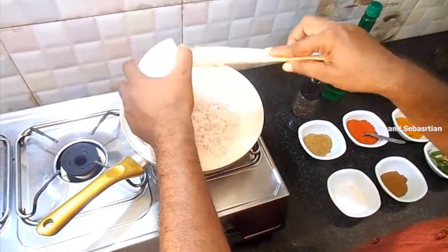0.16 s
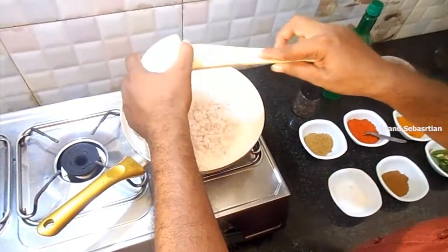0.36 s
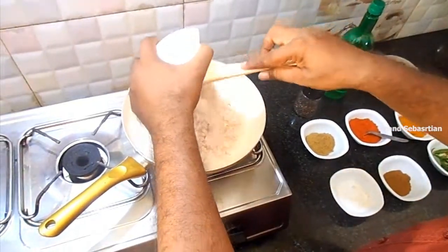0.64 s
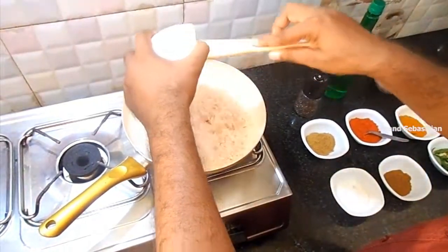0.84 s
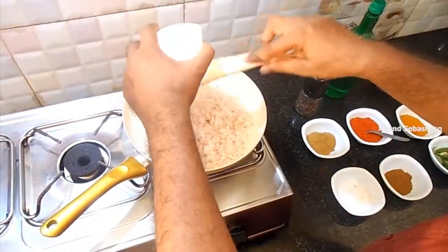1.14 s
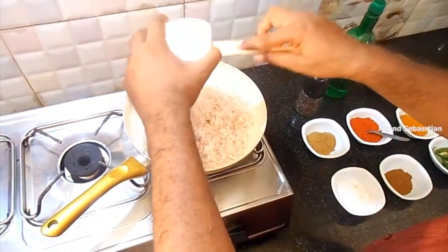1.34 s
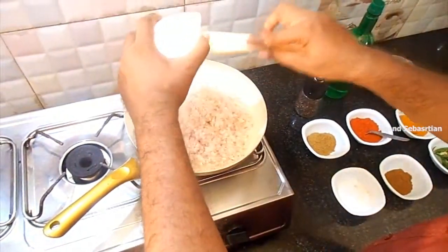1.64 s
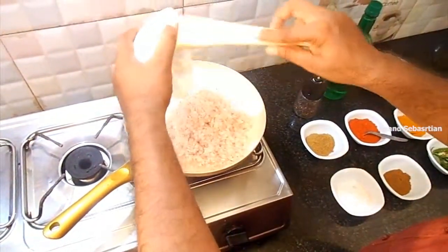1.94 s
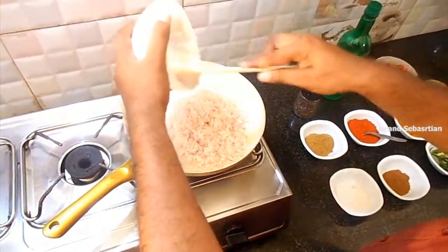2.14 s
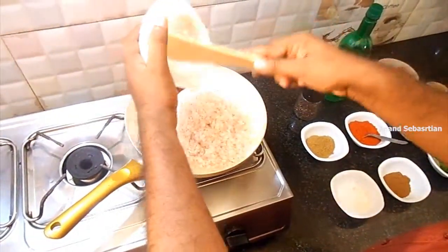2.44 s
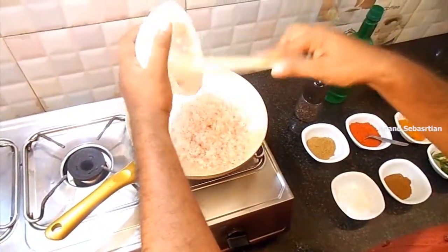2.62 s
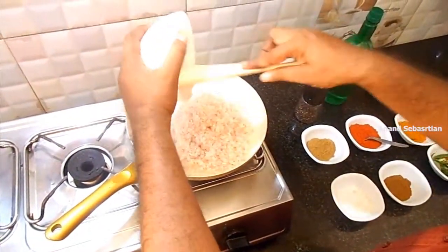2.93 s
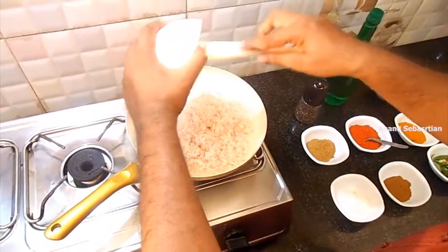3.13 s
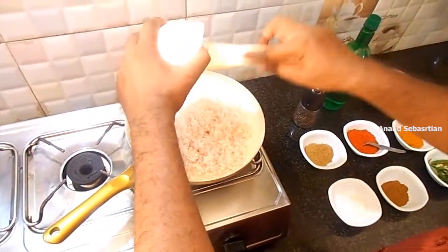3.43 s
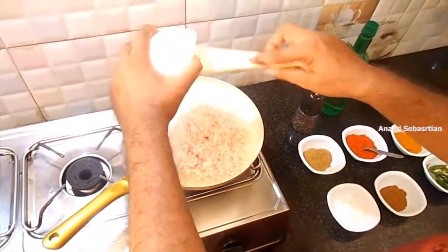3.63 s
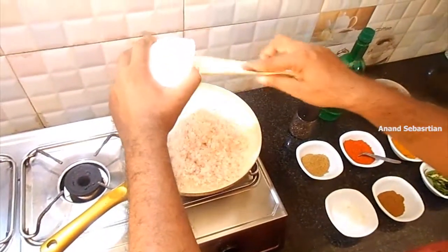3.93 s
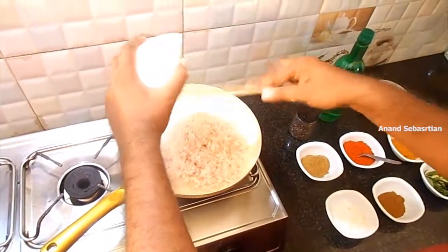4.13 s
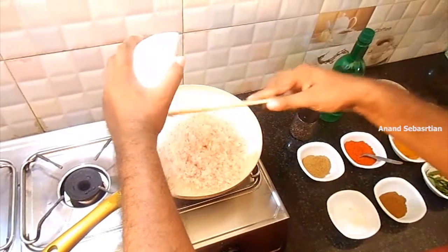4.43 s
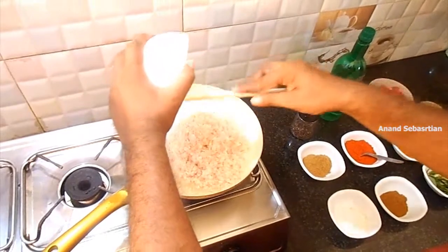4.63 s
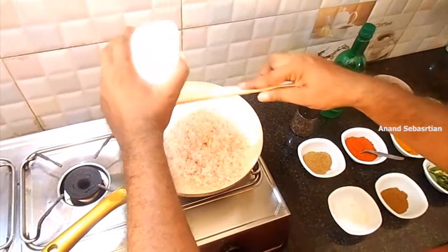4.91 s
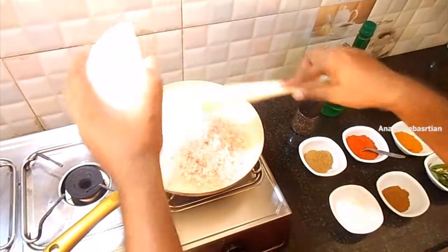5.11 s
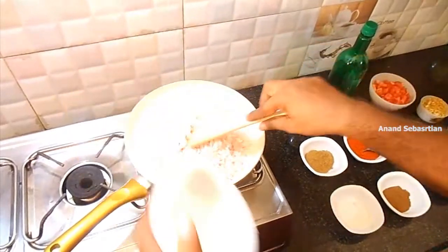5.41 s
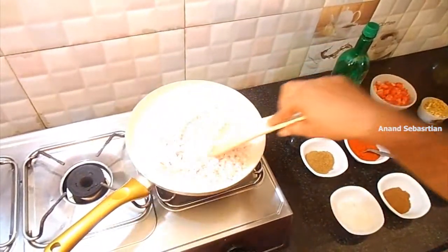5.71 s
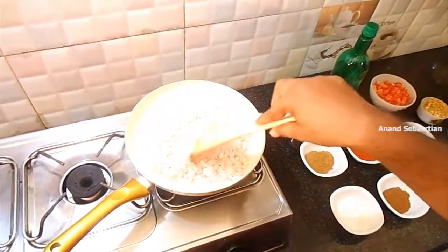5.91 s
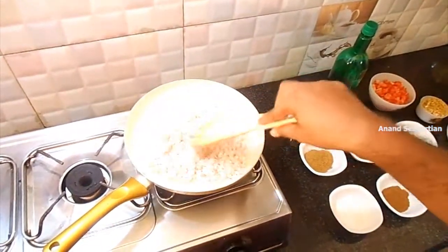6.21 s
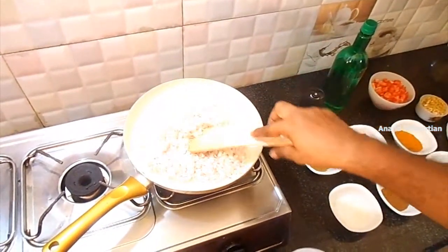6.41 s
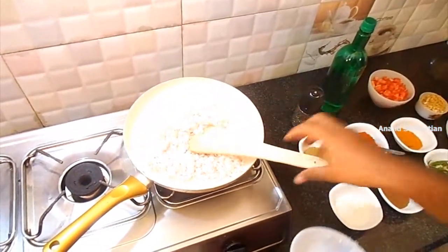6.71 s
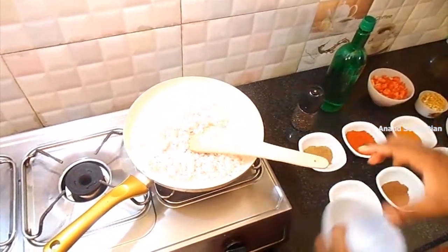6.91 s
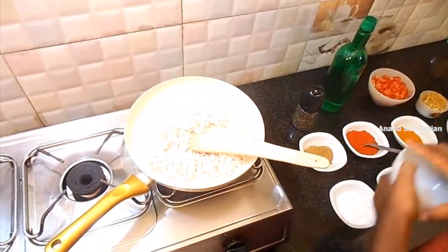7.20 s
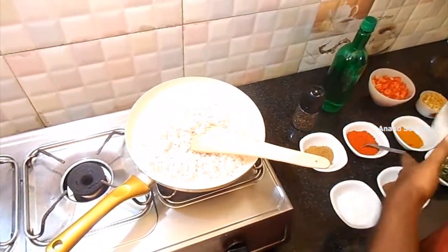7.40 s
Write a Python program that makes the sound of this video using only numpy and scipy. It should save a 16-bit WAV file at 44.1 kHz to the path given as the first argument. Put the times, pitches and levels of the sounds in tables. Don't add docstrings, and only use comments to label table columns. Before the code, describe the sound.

Chopped onion fries in hot oil very close to a stereo microphone in a kitchen. The sizzle is continuous, dense and bright, made of countless tiny bubble bursts over a hiss, with little bass and faint irregular low ticks. It dips slightly around 0.7 s, swells at 1 s and dips again near 2.5 s. Sharp oil spits snap at about 0.2, 0.9, 1.35, 1.5, 2.3, 2.5, 3.2, 4.4, 4.7 and 5.0 s, some leaning to one side. A wooden spatula taps a hollow plastic bowl: a clear knock at 1.1 s, a cluster at 2.2-2.5 s with dull rumble, more at 3.1-3.5 s, a faint one at 4.1 s, a clacking double hit with deeper rumble at 4.45 s, and another at 4.75 s. From 4.8 s the frying is somewhat softer; a tiny scrape comes at 5.2 s, a weak tap at 5.45 s and a small spit at 5.7 s. Then only slowly dulling sizzle until 7.5 s.

```python
import sys
import numpy as np
from scipy import signal
from scipy.fft import rfft, irfft, next_fast_len
from scipy.io import wavfile

SR = 44100
rng = np.random.default_rng(int(sys.argv[2]) if len(sys.argv) > 2 else 0)


def int16_out(signal):
    q = np.round(np.clip(np.atleast_2d(signal).T, -1, 1) * 32767)
    wavfile.write(sys.argv[1], SR, q.astype(np.int16))


def attenuation_scalar(level_db):
    decades = np.asarray(level_db, float) / 20
    return 10 ** decades


N = 332955

# (time [s], sizzle level [dB], tilt [dB])
VIGOUR = [(0.0, -31, .5), (.2, -30.5, 2), (.67, -30.5, 2), (.73, -33.5, 2), (.86, -32.5, 0.5),
          (.97, -28, .5), (1.58, -29.5, 1), (1.67, -31.5, 1), (1.74, -29, 1), (2.46, -29.5, 1),
          (2.53, -33, 1), (2.72, -31.5, 1), (3.2, -30, 0.5), (3.32, -30.5, .5), (4.72, -30, -.5),
          (4.83, -33.5, 0), (6.5, -32.5, -1), (7.55, -34, -1)]


def rms_one(x):
    return x / np.sqrt(np.mean(x ** 2) + 1e-20)


def in_time(rows):
    s, *columns = np.transpose(rows)
    return [np.interp(np.arange(N) / SR, s, c) for c in columns]


def at_hz(points, hz):
    table_hz, table_db = np.transpose(points)
    return np.interp(np.log(hz + 1), np.log(table_hz), table_db)


def drift(rate):
    step = 40
    pole = np.exp(-2 * np.pi * rate * step / SR)
    noise = rng.standard_normal(N // step + 2002)
    slow = signal.lfilter([1], [1, -2 * pole, pole ** 2], noise)[2000:]
    return np.interp(np.arange(N) / step, np.arange(len(slow)), rms_one(slow))


def ring(clicks, hz, t60):
    radius, angle = attenuation_scalar(-60 / (t60 * SR)), 2 * np.pi * hz / SR
    recursion = [1, -2 * radius * np.cos(angle), radius ** 2]
    return signal.lfilter([0, np.sin(angle)], recursion, clicks + 1e-18)


def click(s, size):
    out = np.zeros(N)
    out[round(s * SR)] = size
    return out


def gate_opening():
    # (time [s], opening [dB], hold [s])
    strokes = [(0.0, 11, 0.29), (0.587, 7, .12), (0.997, 9.5, .1), (1.102, 15.5, 0.14), (1.548, 6.5, .3),
               (1.88, 10.5, 0.13), (2.22, 17, 0.066), (2.45, 7.5, 0.47), (2.91, 10, .4), (3.3, 11, 0.28),
               (3.7, 8, 0.28), (4.086, 12.5, 0.19), (4.46, 13.5, 0.1), (4.75, 13.5, 0.035),
               (5.035, 10.5, 0.075), (5.335, 7, 0.18), (5.91, 5.5, 0.073), (5.6, 3, .15), (6.697, 0, 0.32),
               (7.35, 4.5, 0.061)]
    opens_db_per_s, shuts_db_per_s, shut_db = 250, 51, -2.5
    s, db, hold = np.transpose(strokes)[:, :, None]
    t = np.arange(0, N, 40) / SR
    rise = opens_db_per_s * np.maximum(s - t, 0)
    fall = shuts_db_per_s * np.maximum(t - s - hold, 0)
    widest = (db - rise - fall).max(axis=0)
    return np.interp(np.arange(N) / SR, t, np.maximum(widest, shut_db))


def bass_ticks(level_db):
    ticks_per_s, tick_db, hush_db, side_db = 103.9, -47.5, -77, -9.5
    at = (np.arange(.0064, N / SR - .01, 1 / ticks_per_s) * SR).astype(int)
    sizes = rng.normal(0, 1.6, (2, len(at)))
    heard = rng.random(len(at)) < .5
    ticks = np.zeros((2, N))
    ticks[:, at] = sizes * heard * attenuation_scalar(tick_db + 2.4 * drift(5)[at] - 1.5)
    mid, side = ticks + attenuation_scalar(hush_db) * rng.standard_normal((2, N))
    ports = mid + attenuation_scalar(side_db) * side * [[1], [-1]]
    ports = ports * attenuation_scalar(level_db - level_db.mean())
    bass = signal.butter(2, 900, fs=SR, output="sos")
    return signal.sosfilt(bass, ports) * attenuation_scalar(13.0)


def rumbles():
    # (time [s], level [dB], lowest frequency [Hz], t60 [s])
    knocks = [
        (2.21, -63, 500, 0.67),
        (2.3, -55.5, 360, 0.59),
        (2.53, -60, 400, 0.21),
        (4.445, -56, 306, 0.93),
    ]
    out, t = np.zeros((2, N)), np.arange(N) / SR
    for s, db, low_hz, t60 in knocks:
        hollow = signal.butter(3, [low_hz, 850], "band", fs=SR, output="sos")
        mid, side = signal.sosfilt(hollow, rng.standard_normal((2, N)))
        decay = (t > s) * attenuation_scalar(db - 60 * np.maximum(t - s, 0) / t60)
        out += rms_one(mid + attenuation_scalar(-12.0) * side * [[1], [-1]]) * decay
    return out


def scrape():
    start_s, end_s, mode_hz, t60_s, level_db = 5.18, 5.25, 1998, .05, -41
    t = np.arange(N) / SR
    catches = rng.standard_normal(N) * (t > start_s) * (t < end_s)
    return attenuation_scalar(level_db - 24) * ring(catches, mode_hz, t60_s)


def taps():
    # (time [s], peak level [dB], loudest mode [Hz],
    # clack relative level [dB], whole-bowl relative level [dB])
    hits = [(1.118, -39.5, 627, -24, 14), (1.119, -27, 1180, -19, -3), (2.21, -38.5, 915, -14, -4),
            (2.263, -34, 1110, -8, -4), (2.302, -33.5, 890, -14, 1), (2.536, -40, 1110, -12, 0),
            (3.115, -38, 950, -10, 0), (3.315, -27.5, 1150, -16, -8), (3.481, -30.5, 886, -21, -1),
            (4.09, -40, 1160, -16, -4), (4.441, -39, 1420, -14, 0), (4.445, -31.5, 886, -20, -7),
            (4.751, -29, 900, -14, -10), (4.885, -54, 974, -14, -7), (5.458, -39, 960, -12, -10)]
    # (frequency [Hz], level [dB], t60 [s])
    bowl = [(588, -11, 0.067), (646, -6, .03), (900, -8, 0.028), (1180, -20, 0.03)]
    # (frequency [Hz], level [dB], t60 [s])
    blade = [(1530, -13, .012), (1900, -9, .012), (2260, -2, .018), (2750, -1, .017), (3200, -6, .01),
             (3900, -3, .01)]
    contact_s, slap_s, slap_db = 0.0012, 4.4432, -24.5
    out = np.zeros(N)
    chance_db = rng.normal(0, 2.7, (len(hits), len(bowl) + len(blade)))
    for (s, peak_db, spot_hz, clack_db, whole_db), luck_db in zip(hits, chance_db):
        a, b = round(s * SR), min(N, round((s + .3) * SR))
        hit = click(0, 0.91)[:b - a]
        struck = [(spot_hz, peak_db + .5, .04)]
        struck += [(hz, peak_db + whole_db + db, t60) for hz, db, t60 in bowl]
        struck += [(hz, peak_db + clack_db + db, t60) for hz, db, t60 in blade]
        rings = np.zeros(b - a)
        for (hz, db, t60), extra_db in zip(struck, np.r_[0, luck_db]):
            rings += attenuation_scalar(db + extra_db) * ring(hit, hz, t60)
        out[a:b] += rings * (1 - np.exp(-np.arange(b - a) / SR / contact_s))
    slap = click(slap_s, attenuation_scalar(slap_db)) + click(slap_s + 0.003, attenuation_scalar(slap_db - 2))
    return out + sum(attenuation_scalar(db) * ring(slap, hz, t60) for hz, db, t60 in blade)


def spits():
    # (time [s], peak level [dB], left-right difference [dB])
    droplets = [(0.178, -11, -5), (0.4653, -31, -5), (0.5067, -16, -0.5), (0.8764, -7, -1.0),
                (0.9353, -16, 0.0), (1.3513, -8, -0.5), (1.5304, -4.5, 1), (2.2633, -9, -1.0),
                (2.464, -5, -9), (2.609, -27, -4), (2.6454, -25, 8), (3.2266, -6, -0.5), (4.4408, -9, -3),
                (4.7287, -11, 7), (5.0409, -13, -0.5), (5.7259, -19, 4)]
    pulses = np.zeros((2, N))
    for s, peak_db, pan_db in droplets:
        pulses[:, round(s * SR) + 50] = attenuation_scalar(peak_db + 3.5 + np.array([pan_db, -pan_db]) / 2)
    spray = signal.lfilter([.12], [1, -.985], pulses) * rng.standard_normal(N)
    small_source = signal.butter(2, [3500, 14000], "band", fs=SR, output="sos")
    return signal.sosfilt(small_source, spray - pulses)


def steam_bursts():
    bursts_per_s, spread_db, hiss = 12000, 2, 0.94
    sizes = attenuation_scalar(spread_db * np.minimum(rng.exponential(1, N), 5)) * rng.choice([-1, 1], N)
    born = rng.random(N) < bursts_per_s * attenuation_scalar(.8 * drift(25)) / SR
    return rms_one(sizes * born) + hiss * rng.standard_normal(N)


def pan_spectra(bursts, size, hz):
    # (frequency [Hz], level per Hz [dB])
    colour = [(330, -48), (560, -12.5), (591, -15.5), (773, -13.5), (896, -8), (1010, -8.5), (1360, -7),
              (1600, -4), (2030, -0.5), (2490, -2), (3040, 0.5), (4320, -0.5), (10900, -3.5), (13000, -4.5),
              (14200, -7)]
    # (frequency [Hz], level per Hz [dB])
    across_colour = [(330, -40), (540, -19.5), (1200, -19), (1700, -15.5), (2400, -26.5), (3200, -6),
                     (3700, -9), (4800, -4.5), (12000, 1.5), (14200, -3)]
    # (frequency [Hz], width [Hz], height [dB])
    modes = [(610, 18, 6), (646, 42, -6), (894, 9, 5.5), (1180, 35, 1.5), (1350, 21, 7.5), (1465, 12, 5.5),
             (1956, 16, 5), (3075, 81, 0)]
    across_db, lean_db, lean_hz = -6.5, -8, 12700
    across = rms_one(bursts * rng.standard_normal(N))
    ringing_db = sum(db / (1 + (2 * (hz - top_hz) / width) ** 2) for top_hz, width, db in modes)
    mid = rfft(bursts, size) * attenuation_scalar(at_hz(colour, hz) + ringing_db)
    side = rfft(across, size) * attenuation_scalar(at_hz(across_colour, hz) + across_db)
    side = side - mid * attenuation_scalar(lean_db) * hz ** 8 / (hz ** 8 + lean_hz ** 8)
    return np.array([mid + side, mid - side])


def part_levels(level_db, tilt_db):
    bright_drift_db_per_s = -0.07
    body_follows = 0.73
    parts = [(690, 1.23 * (gate_opening() - level_db)),
             (830, (body_follows - 1) * level_db - 1.2 * tilt_db),
             (2300, -.6 * tilt_db),
             (4200, 0 * level_db),
             (9000, tilt_db - bright_drift_db_per_s * np.arange(N) / SR)]
    levels = [db - 10 * np.log10(np.mean(attenuation_scalar(2 * db))) for _, db in parts]
    return [hz for hz, _ in parts], np.array(levels)


def sizzle():
    shared_db, patchy_db = 0.38, 0.39
    size = next_fast_len(N)
    hz = np.arange(size // 2 + 1) * SR / size
    ports = pan_spectra(steam_bursts(), size, hz)
    level_db, tilt_db = in_time(VIGOUR)
    part_hz, parts_db = part_levels(level_db, tilt_db)
    knots = np.log(part_hz)
    centres = np.log(np.r_[690, 770, np.geomspace(950, 13000, num=13)])
    out, together = 0, drift(7.5)
    for k, centre in enumerate(centres):
        share = np.interp(np.log(hz + 1), centres, np.arange(len(centres)) == k)
        weights = np.array([np.interp(centre, knots, row) for row in np.eye(len(knots))])
        gain = attenuation_scalar(weights @ parts_db + shared_db * together + patchy_db * drift(10.8))
        out = out + gain * irfft(ports * share, size)[:, :N]
    return attenuation_scalar(level_db + 2.08) * rms_one(out)


def scene():
    return scrape() + taps() + spits() + sizzle()


def band_limit(x):
    return signal.sosfilt(signal.butter(12, 15380, fs=SR, output="sos"), x)


def record(dry):
    gate_hz, top_hz = 537.6, 14340
    rounded = .4 * np.tanh(dry / .4)
    gate = signal.cheby2(8, 40, gate_hz * .9, "high", fs=SR, output="sos")
    gated = signal.sosfilt(gate, rounded) + rumbles() + bass_ticks(in_time(VIGOUR)[0])
    top_cut = signal.ellip(14, .5, 75, top_hz * .992, fs=SR, output="sos")
    return band_limit(signal.sosfilt(top_cut, gated))


dry = scene()
out = record(dry)
int16_out(out)
```